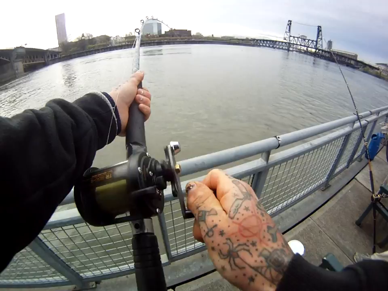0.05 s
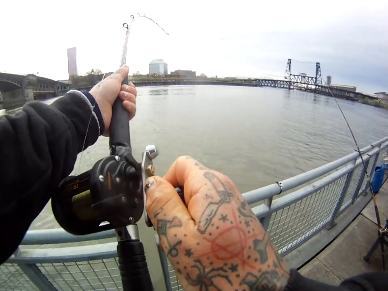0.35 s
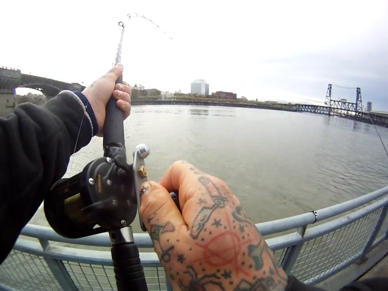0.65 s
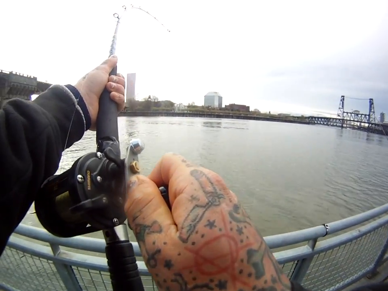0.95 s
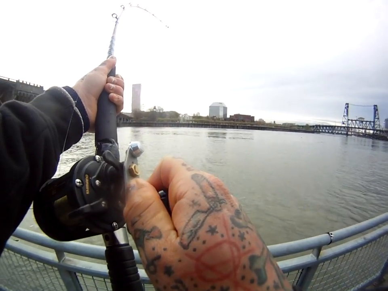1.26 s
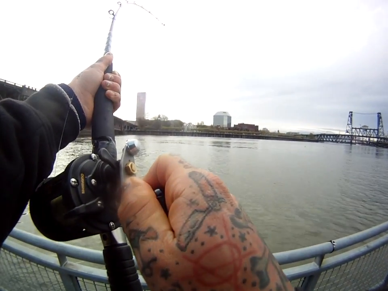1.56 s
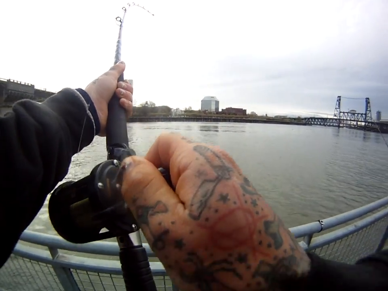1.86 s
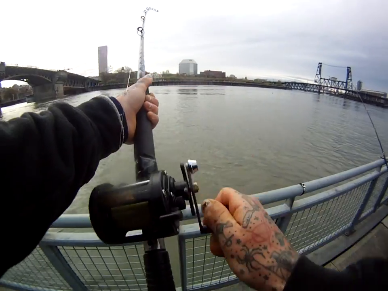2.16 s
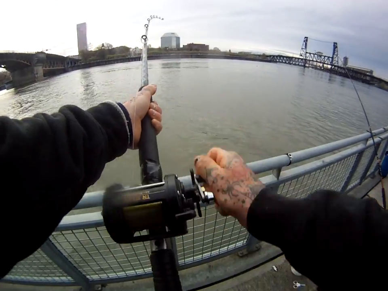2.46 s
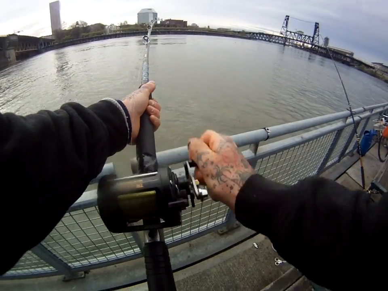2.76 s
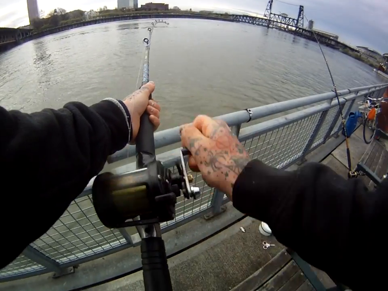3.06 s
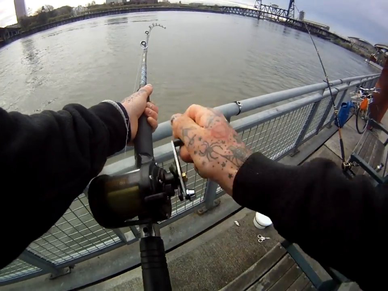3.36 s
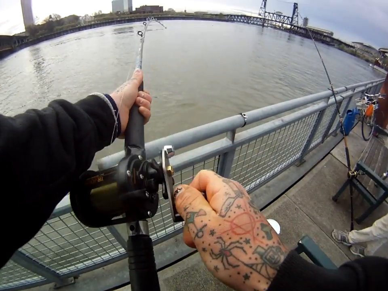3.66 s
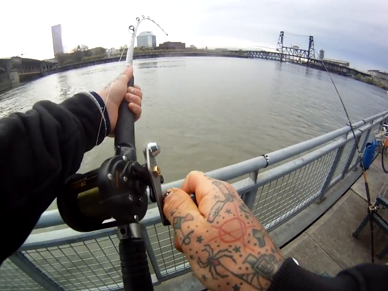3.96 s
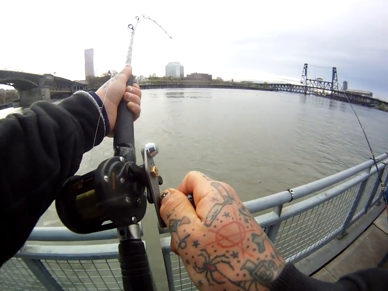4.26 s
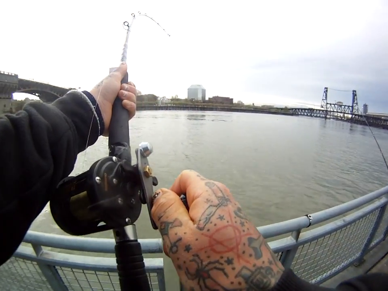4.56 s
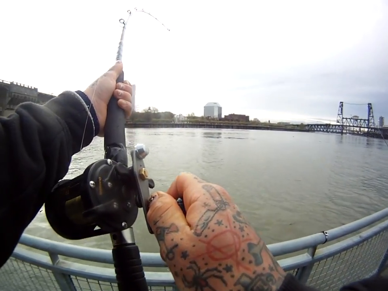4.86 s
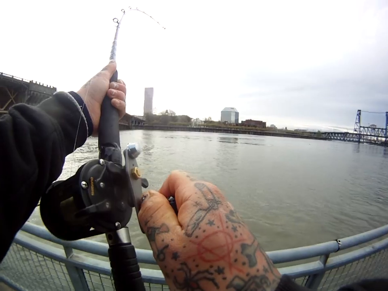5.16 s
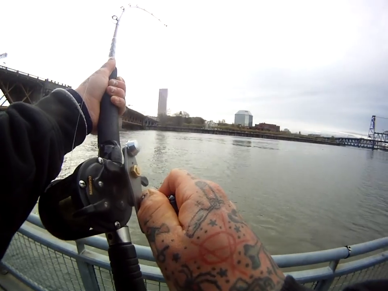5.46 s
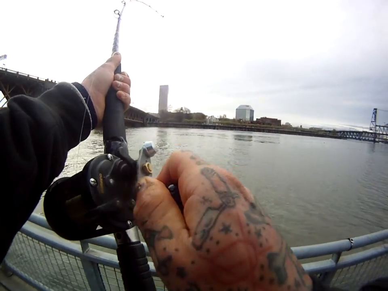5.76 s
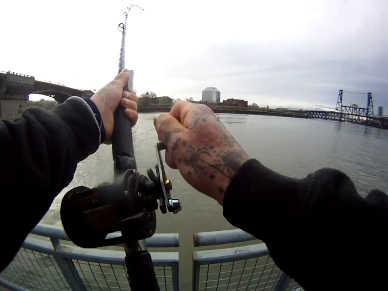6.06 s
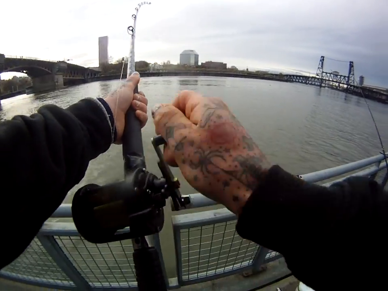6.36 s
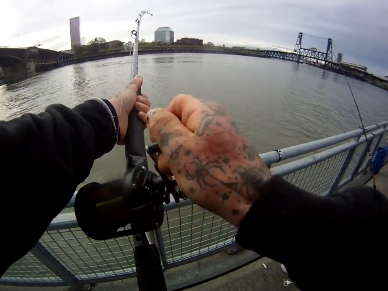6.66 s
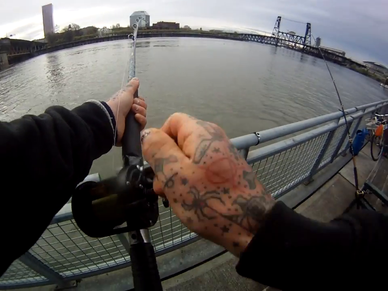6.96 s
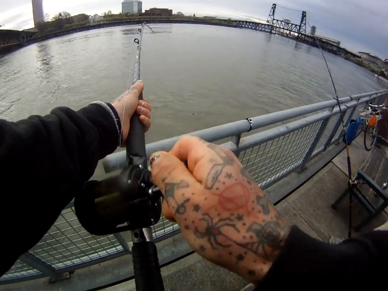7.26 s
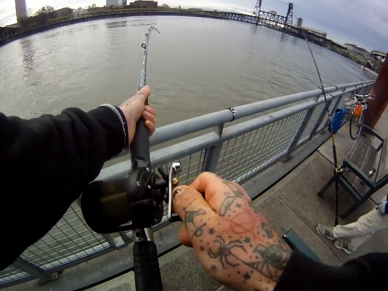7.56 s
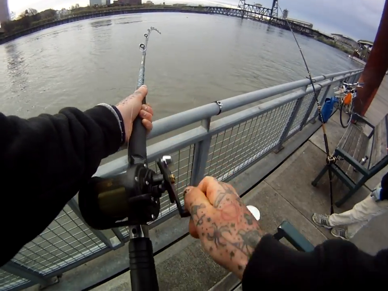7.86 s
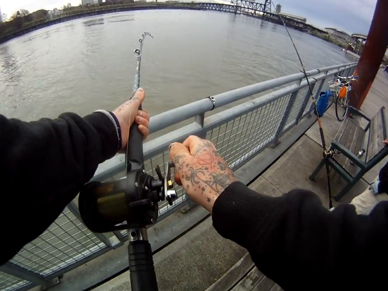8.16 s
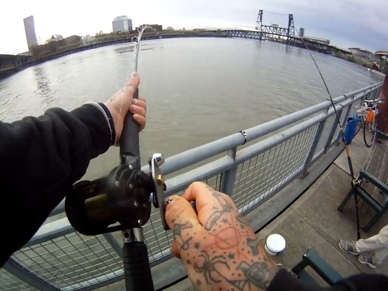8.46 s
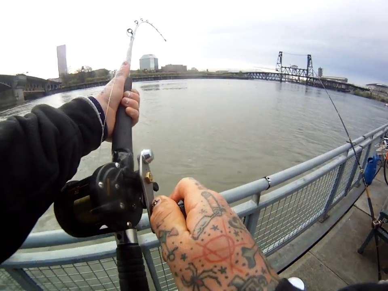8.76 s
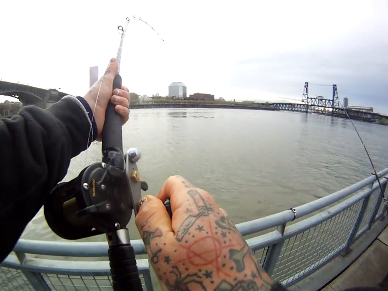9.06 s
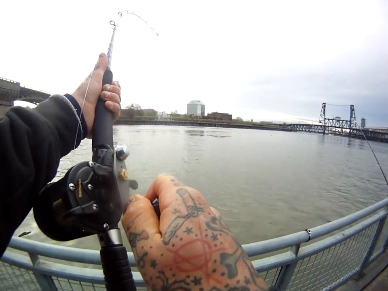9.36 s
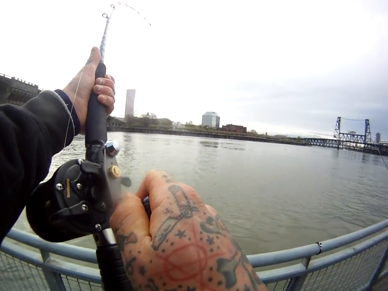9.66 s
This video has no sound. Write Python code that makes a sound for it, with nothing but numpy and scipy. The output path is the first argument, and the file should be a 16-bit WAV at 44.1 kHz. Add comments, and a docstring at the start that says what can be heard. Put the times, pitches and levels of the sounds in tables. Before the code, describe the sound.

Close scraping and knocking on a microphone's plastic case accompany two spells of a fishing reel clicking, above a faint low rumble.

```python
"""Reeling in a fish on a river quay

An angler cranks a big reel, heard by a cased camera worn on the chest. The pawl ticks and the line
hisses through the air; the working arms make the mount scrape, knock and creak, so the plastic case
rings. Underneath: the angler's pulse, wind on the case and the low drone of a distant town."""
import sys
import numpy as np
from scipy import signal
from scipy.fft import rfft, irfft
from scipy.io import wavfile
from scipy.ndimage import uniform_filter1d

SR = 44100
rng = np.random.default_rng(int(sys.argv[2]) if len(sys.argv) > 2 else 0)


def digitize_waveform(pressure):
    """Quantize a signal to 16-bit integers and store it at the path in sys.argv[1].

    Rows of a 2-D input are taken as channels; values are limited to [-1, 1].
    """
    field = np.atleast_2d(pressure).T
    bounded = np.clip(field, -1, 1)
    quanta = np.round(bounded * 32767).astype(np.int16)
    wavfile.write(sys.argv[1], SR, quanta)


N = 432612
TIME_S = np.arange(N) / SR
FREQ_HZ = np.linspace(0, SR / 2, 4097)

# handle turns, about 3 a second: (start [s], length [s], rubbing [dB], pawl [dB], arm effort [0-1])
HANDLE_TURNS = [(1.946, 0.4, -45.5, -45.5, 0.93), (2.358, .35, -40.5, -45, 1), (2.695, 0.31, -36, -46, 1),
                (3.002, 0.32, -37.5, -43.5, 0.97), (3.328, 0.27, -41.5, -45, 0.83),
                (6.023, .33, -42.5, -49, 0.9), (6.355, .322, -36.5, -46, 0.77),
                (6.678, .335, -35, -47, 0.97), (7.004, 0.33, -31, -45.5, 1),
                (7.332, 0.34, -34.5, -47.5, 0.76), (7.685, 0.36, -33, -45, 1),
                (8.027, 0.33, -38.5, -59, 0.9)]


def pawl(gain_db=20, snap_s=0.0024, echo_s=0.0015, echo_db=-6):
    """The pawl snaps onto the next tooth; each tick comes again, fainter, about a millisecond later."""
    # tick spectrum: (frequency [Hz], gain [dB])
    tick_spectrum = [(1500, -33), (2800, 9), (3800, 5), (5200, 4.5), (7000, 2), (8500, -0.5), (10500, -9),
                     (15000, -42)]
    ticks = teeth()
    snaps = impulses(ticks, lag_s=0.001)
    echoes = undb(echo_db) * impulses(ticks, lag_s=0.00053 + echo_s)
    return undb(gain_db) * ring(chatter(snaps + echoes, snap_s), colour(tick_spectrum))


def teeth(per_turn=6, pitch_turns=0.151, scatter_db=2.5):
    """Ticks as (time [s], level [dB]): an even run of teeth in each turn, then a short gap."""
    # single teeth while the handle creeps: (time [s], level [dB])
    lone_teeth = [(1.863, -43.5), (5.846, -44), (5.982, -46), (8.450, -44.5)]
    runs = [(start_s + k * pitch_turns * length_s, db + scatter_db * rng.standard_normal())
            for start_s, length_s, _, db, _ in HANDLE_TURNS for k in range(per_turn)]
    return lone_teeth + runs


def line_hiss(flutter_db=2, rest_db=-77, cranking_db=-69):
    """Gears and taut line hiss and flutter as the handle turns or the fish draws line."""
    # line drawn through the guides: (time [s], level [dB], half length [s])
    line_runs = [(.13, -61, 0.2), (2.12, -57, 0.16), (2.42, -62, 0.045)]
    spectrum_hz_db = [(2000, -38), (3300, 9), (5500, 8), (7000, 4.5), (9000, -4), (14000, -13)]
    hiss = coloured_noise(spectrum_hz_db)
    winding = undb(effort_db(rest_db, cranking_db))
    return hiss * np.hypot(winding, swells(line_runs)) * undb(flutter_db * walk(90))


def mount_rubbing(slide_db=0.2, slips_per_s=1100, scatter_db=4, smooth_db=-5, judder_db=4):
    """Stick-slip friction: dense, tiny, uneven slips that judder as the mount slides."""
    # drag from rod tugs and slow leans: (time [s], level [dB], half length [s])
    scrapes = [(0.08, -39.5, 0.023), (0.113, -41, 0.028), (0.205, -39, 0.052), (0.289, -44, 0.047),
               (1.15, -52.5, 0.089), (2.061, -29, 0.019), (2.121, -34.5, 0.022), (2.191, -34, 0.011),
               (2.237, -32.5, 0.018), (2.429, -37.5, 0.014), (2.47, -30.5, 0.013), (2.803, -37, 0.0099),
               (3.2, -47, 0.4), (3.433, -27, 0.0061), (4.65, -59, 0.24), (5.882, -44, 0.03),
               (6.246, -36.5, 0.011), (6.29, -34.5, 0.019), (6.428, -33.5, 0.0095), (6.947, -33, 0.014),
               (7.167, -31.5, 0.016), (7.268, -24.5, 0.021), (7.487, -28.5, 0.016), (7.805, -33, 0.012),
               (7.92, -36, .02), (7.983, -16.5, 0.011), (8.49, -44.5, 0.22), (9.6, -60, 0.39)]
    # sliding is brighter than a blow: (frequency [Hz], gain [dB])
    rasp_spectrum = [(400, 2), (1000, -0.5), (2000, -0.5), (3300, 3.5), (4500, 3.5), (8000, 0.5),
                     (15000, 0.5)]
    sizes = undb(scatter_db * np.minimum(white(), 2))
    slips = (rng.random(N) < slips_per_s / SR) * sizes * np.sign(white())
    grit = unit_rms(unit_rms(slips) + undb(smooth_db) * white())
    drag = np.hypot(arm_surges(), swells(scrapes)) * undb(slide_db)
    sliding = drag * unit_rms(grit * undb(judder_db * walk(170)))
    resting = chafing() * unit_rms(grit + white())
    return ring(sliding, colour(rasp_spectrum)) + resting


def arm_surges():
    """Drag envelope: the arm pulls the mount through the same four surges in every turn."""
    # surges: (position [turns], level [dB], half length [s])
    surges = [(0.033, -6, 0.023), (0.307, -2, 0.015), (.49, -1.5, .021), (0.809, -1, 0.02)]
    return swells([(start_s + position * length_s, turn_db + db, half_s)
                   for start_s, length_s, turn_db, _, _ in HANDLE_TURNS
                   for position, db, half_s in surges])


def chafing(rest_db=-55, cranking_db=-51, drift_db=0.9, flicker_db=1.94):
    """Envelope of the never quite still mount: it drifts, flickers and grows with effort."""
    return undb(effort_db(rest_db, cranking_db) + drift_db * walk(2.61) + flicker_db * walk(40))


def mount_knocks(gain_db=8, clacks_per_s=35, clack_db=11):
    """The mount slips and hits the case: blow, rebound, quick joint rattle, fainter settling."""
    # blows: (time [s], level [dB])
    blows = [(0.766, -31.5), (2.638, -11.5), (2.664, -18), (2.837, -20), (3.266, -10), (3.422, -28),
             (5.899, -21), (6.246, -22), (6.269, -16), (6.278, -16.5), (6.296, -16), (6.608, -15.5),
             (7.149, -21), (7.274, 1.5), (7.466, -17), (7.491, -7), (7.835, -7), (7.959, -11.5),
             (7.975, 0.5), (7.987, 8), (8.187, -16.5), (8.327, -1.5)]
    spectrum_hz_db = [(200, 0.7), (550, 3.8), (900, -0.42), (1500, -2.4), (2000, 2), (2800, 1.9),
                      (15000, 1.7)]
    light_clacks = (rng.random(N) < clacks_per_s / SR) * arm_surges() * undb(clack_db)
    hits = impulses(blows, lag_s=0.0008) + light_clacks
    rebound = undb(-4) * rebounds(hits)
    rattle = undb(-12) * chatter(hits, decay_s=0.002)
    settling = undb(-16) * chatter(hits, decay_s=0.0084)
    return undb(gain_db) * ring(hits + rebound + rattle + settling, colour(spectrum_hz_db))


def rebounds(hits, shortest_s=0.0005, longest_s=0.0017):
    """Each blow bounces back after its own short wait, which colours it."""
    onsets = np.flatnonzero(hits)
    wait_s = rng.uniform(shortest_s, longest_s, len(onsets))
    echoes = np.zeros(N)
    echoes[np.minimum(onsets + (wait_s * SR).astype(int), N - 1)] = hits[onsets]
    return echoes


def mount_creaks(slip_hz=2100, waver=0.09, tone_db=-15.5, grit_db=-5):
    """For a few cycles the slips lock onto the strongest case resonance."""
    # the mount sticks and gives: (time [s], level [dB], half length [s])
    creaks = [(1.345, -41, 0.0056), (2.040, -29, 0.0022), (2.229, -25, 0.0026), (2.640, -28, 0.0018),
              (6.523, -22, 0.0013), (8.0625, -17, 0.0024), (8.097, -25.5, 0.0021), (8.134, -24.5, 0.0032)]
    pitch_hz = slip_hz * (1 + waver * walk(309))
    tone = np.sin(2 * np.pi * np.cumsum(pitch_hz) / SR)
    return swells(creaks) * (undb(tone_db) * tone + undb(grit_db) * white())


def case_ring(force, leak_db=-46, skirt=2.6):
    """The plastic case rings briefly in its well-damped resonances."""
    # main and top resonances: (frequency [Hz], width [Hz], level [dB])
    main_modes = [(596, 280, -17), (893, 115, -2.5), (1138, 148, -5), (1569, 230, -6), (1928, 179, 1),
                  (2084, 187, 1), (2255, 202, -4), (2525, 290, -13.5), (2940, 213, -10.5),
                  (3350, 250, -10.5), (3678, 220, -13), (4480, 430, -29), (4970, 220, -21),
                  (5360, 280, -27.5), (6970, 610, -25), (8555, 424, -16.5), (9330, 160, -16),
                  (9940, 260, -10), (10580, 330, -22.5)]
    top_modes = [(11050, 300, -27), (12950, 350, -29), (13600, 350, -27), (14050, 380, -14.5),
                 (15000, 450, -24)]
    edge = 4 * (2 ** (1 / skirt) - 1)  # half power at half a width off centre
    power = sum(undb(db) ** 2 / (1 + edge * ((FREQ_HZ - hz) / width_hz) ** 2) ** skirt
                for hz, width_hz, db in main_modes + top_modes)
    return ring(force, np.sqrt(power + undb(leak_db) ** 2))


def strap_sway(force, gain_db=-20):
    """The mount's forces rock the whole camera on its strap: a dull thud."""
    spectrum_hz_db = [(25, -24), (70, -11), (130, 2.5), (250, -5), (500, -20.5), (2000, -47),
                      (8000, -66)]
    return undb(gain_db) * ring(force, colour(spectrum_hz_db))


def heartbeat(first_s=0.758, period_s=0.593, level_db=-40.5, half_s=0.038, scatter_db=2):
    """The steady pulse nudges the camera through the chest strap: soft, deep thumps."""
    spectrum_hz_db = [(12, -22), (24, 8.5), (40, -3), (65, -3.5), (110, -18), (300, -46), (800, -80)]
    rumble = coloured_noise(spectrum_hz_db)
    beats = [(time_s, level_db + scatter_db * rng.standard_normal(), half_s)
             for time_s in np.arange(first_s, N / SR, period_s)]
    return rumble * swells(beats)


def wind(rest_db=-57.5, cranking_db=-43):
    """Wind buffets the case, more while the arms move."""
    # rumble of wind and arm movement: (frequency [Hz], gain [dB])
    buffet_spectrum = [(12, -7.5), (25, -4), (45, -8.5), (80, -14), (150, -19), (300, -30.5), (800, -72)]
    return coloured_noise(buffet_spectrum) * undb(effort_db(rest_db, cranking_db))


def town(level_db=-48, swell_db=1.03):
    """The far town hums across the water."""
    # town noise with its low drone: (frequency [Hz], gain [dB])
    town_spectrum = [(20, -13.5), (52, -4.5), (68, -2.5), (80, 4.5), (100, -5), (135, -7.5), (200, -12.5),
                     (320, -12), (450, -18.5), (900, -18), (1500, -24), (2600, -43), (6000, -76),
                     (12500, -39.5), (16000, -61)]
    return coloured_noise(town_spectrum) * undb(level_db + swell_db * walk(1.625))


def effort_db(rest_db, cranking_db, ease_s=0.31):
    """Level over time, from rest to hard cranking; the arm eases in and out."""
    effort = np.zeros(N)
    for start_s, length_s, _, _, push in HANDLE_TURNS:
        effort[int(start_s * SR):int((start_s + length_s) * SR)] = push
    return rest_db + (cranking_db - rest_db) * uniform_filter1d(effort, int(ease_s * SR))


def swells(rows, skew=0.098):
    """Envelope of (time [s], level [dB], half length [s]) swells that rise faster than they fall."""
    power = np.zeros(N)
    for time_s, db, half_s in rows:
        near = slice(max(int((time_s - 3 * half_s) * SR), 0), int((time_s + 3 * half_s) * SR))
        since_s = TIME_S[near] - time_s
        width_s = half_s * (1 + skew * np.sign(since_s))
        power[near] += undb(db) ** 2 * np.exp(-2 * (since_s / width_s) ** 2)
    return np.sqrt(power)


def impulses(rows, lag_s):
    """One impulse per (time [s], level [dB]) row."""
    hits = np.zeros(N)
    for time_s, db in rows:
        hits[int((time_s + lag_s) * SR)] += undb(db)
    return hits


def chatter(hits, decay_s):
    """A dying rattle after each impulse, of the same energy."""
    fade = np.exp(-2 * TIME_S[:SR // 10] / decay_s)
    power = signal.fftconvolve(hits ** 2, fade / fade.sum())[:N]
    return np.sqrt(np.abs(power)) * white()


def ring(x, gain):
    """Minimum-phase filter with this gain shape over FREQ_HZ; white input keeps its power."""
    cepstrum = irfft(np.log(unit_rms(gain) + 1e-9))
    half = len(cepstrum) // 2
    cepstrum[1:half] *= 2
    cepstrum[half + 1:] = 0
    response = irfft(np.exp(rfft(cepstrum)))
    return signal.oaconvolve(x, response)[:N]


def colour(spectrum):
    """Gain over FREQ_HZ from (frequency [Hz], gain [dB]) points."""
    hz, db = np.transpose(spectrum)
    return undb(np.interp(np.log(FREQ_HZ + 1), np.log(hz), db))


def walk(rate_hz):
    """Random levels joined by ramps, rms 1."""
    hold = int(SR / rate_hz)
    steps = np.repeat(rng.standard_normal(N // hold + 1), hold)
    return unit_rms(uniform_filter1d(steps, hold)[:N])


def coloured_noise(spectrum):
    return ring(white(), colour(spectrum))


def white():
    return rng.standard_normal(N)


def unit_rms(x):
    return x / np.sqrt(np.mean(x ** 2))


def undb(db):
    return 10 ** (np.asarray(db) / 20)


def scene():
    """Contact sounds come through the case, the reel and the town through the air."""
    force = mount_rubbing() + mount_knocks() + mount_creaks()
    camera = case_ring(force) + strap_sway(force)
    reel = pawl() + line_hiss()
    return (camera + reel + heartbeat() + wind() + town())[None]


def record(dry, dip_hz=6020, top_hz=15280):
    """The microphone has a narrow dip; the hardest knock overloads it; the top is cut."""
    dip_band = signal.lfilter(*signal.iirpeak(dip_hz, Q=13, fs=SR), dry)
    clipped = np.clip(dry - 0.85 * dip_band, -1, 1)
    lowpass = signal.ellip(12, 0.2, 70, top_hz, fs=SR, output="sos")
    return signal.sosfilt(lowpass, clipped)


dry = scene()
out = record(dry)
digitize_waveform(out)
```